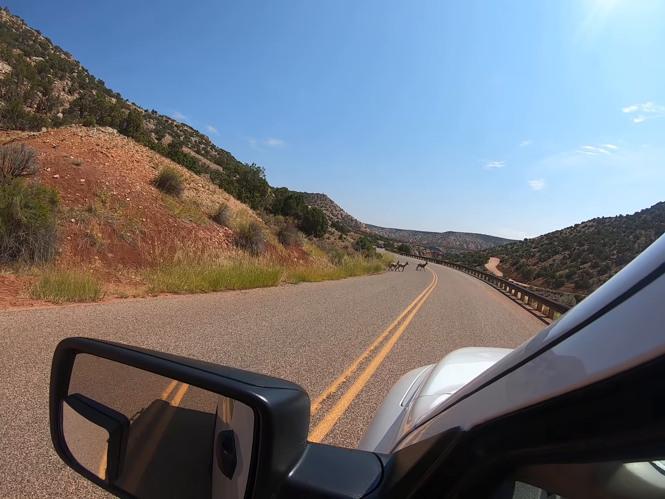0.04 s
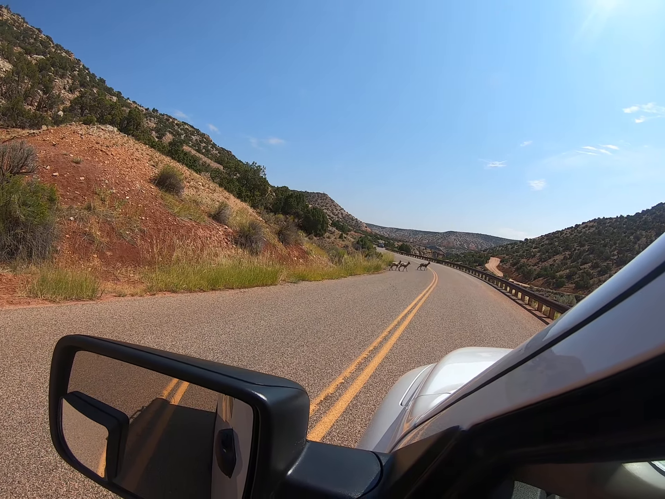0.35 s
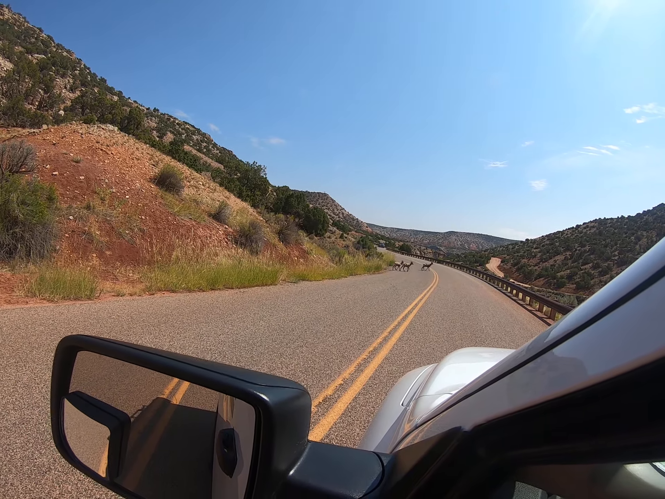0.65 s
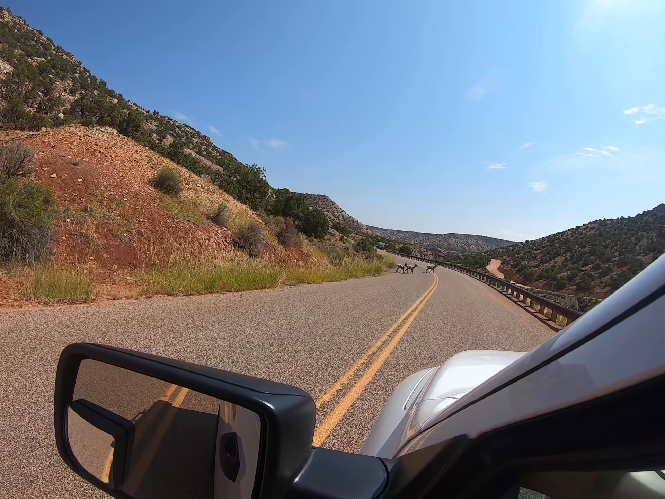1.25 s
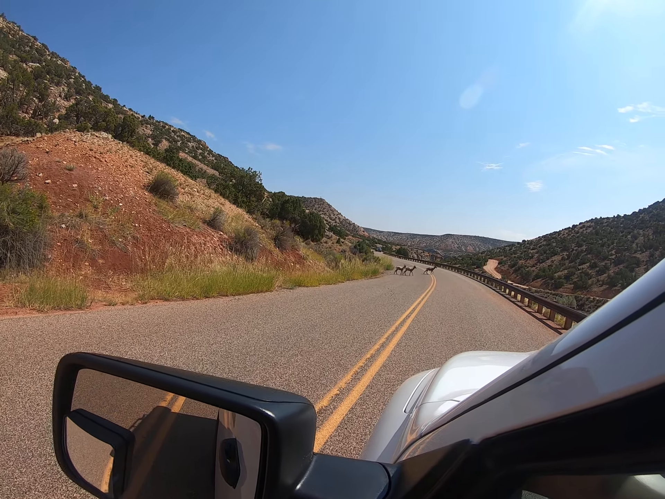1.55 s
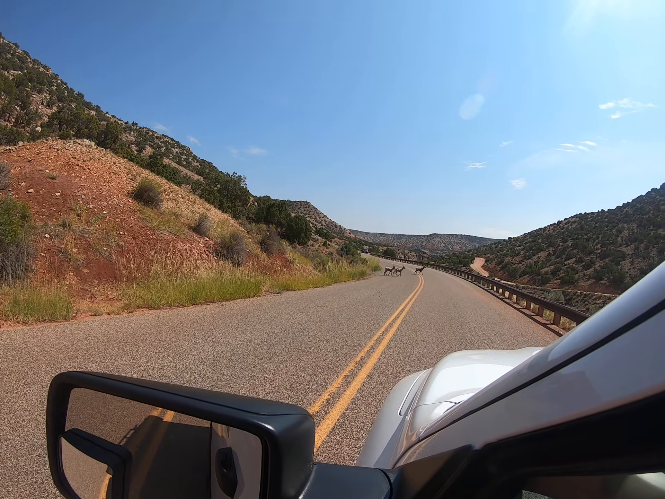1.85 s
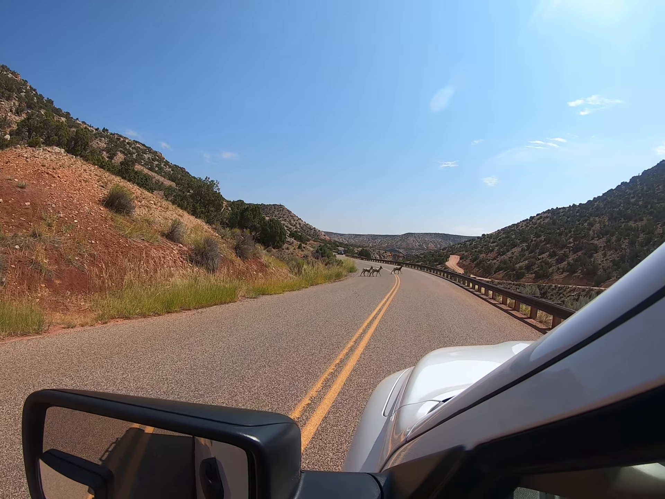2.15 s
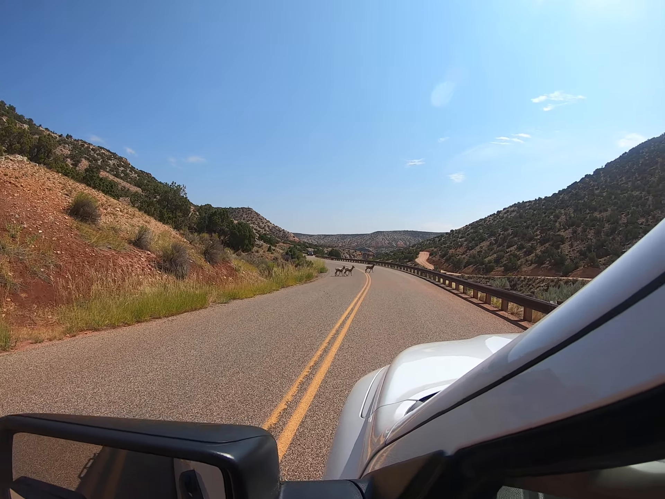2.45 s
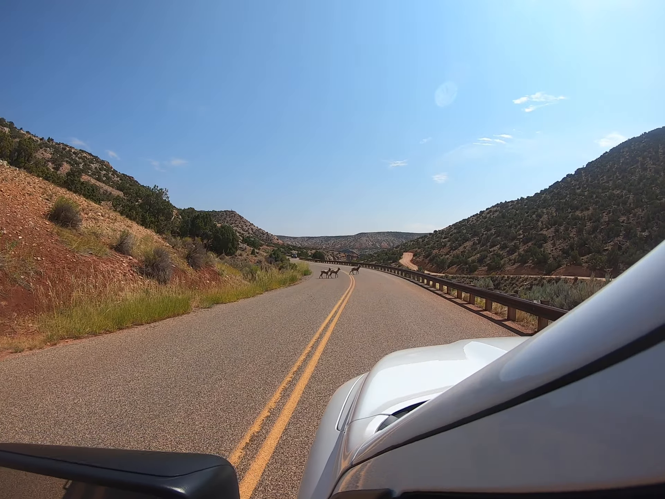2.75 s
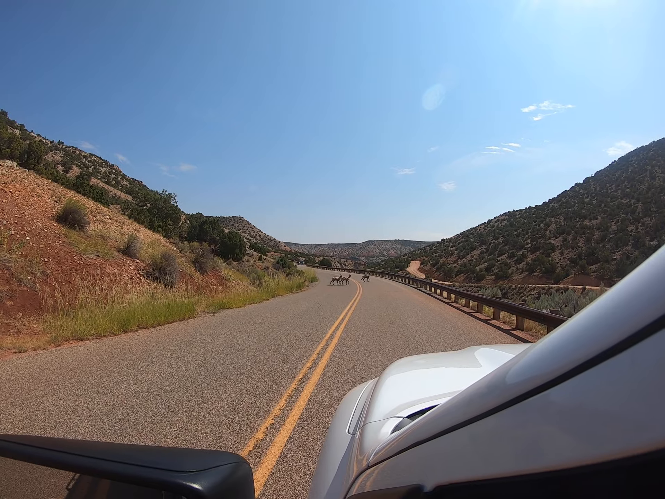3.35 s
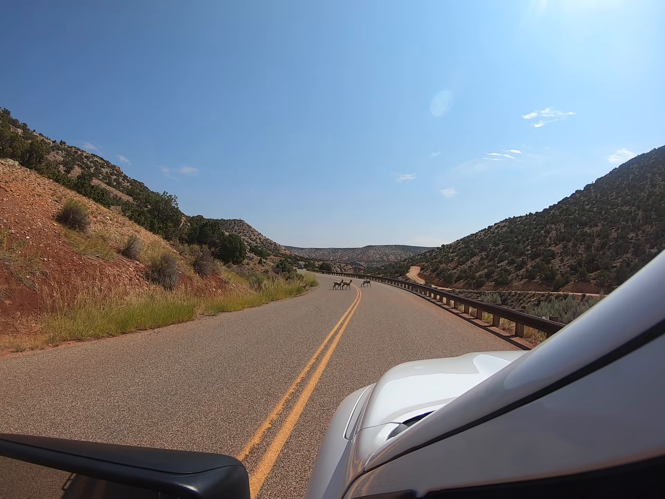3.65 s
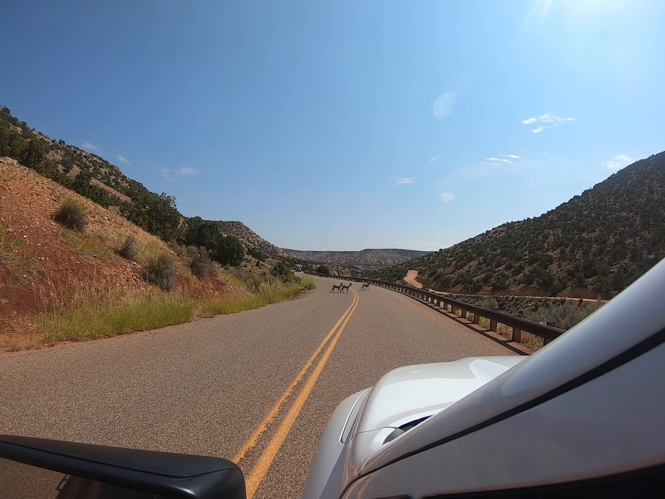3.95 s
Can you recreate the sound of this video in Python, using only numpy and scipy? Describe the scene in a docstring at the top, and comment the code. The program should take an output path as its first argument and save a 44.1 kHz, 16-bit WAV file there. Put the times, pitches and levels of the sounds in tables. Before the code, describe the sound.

Road rumble and gusty wind at a moving truck's open window, with small handling knocks.

```python
"""Tyre and body rumble, slipstream hiss and a steady engine drone: a pickup cruising on a country road,
heard from a camera at its open side window. Eddies buffet the microphone, mostly its right port.
The hand on the camera shifts its grip: brief rustles, three small knocks, a fine crackle.
Near the end a gust swells past and a slipping fingertip squeaks twice."""
import sys
import numpy as np
from scipy import signal
from scipy.fft import rfft, irfft
from scipy.io import wavfile
from scipy.ndimage import uniform_filter1d

SR = 44100
rng = np.random.default_rng(int(sys.argv[2]) if len(sys.argv) > 2 else 0)


def bounce(signal):
    """Save signal as a 16-bit WAV file at the path given by the first command-line argument."""
    frames = np.transpose(np.atleast_2d(signal))
    limited = np.clip(frames, -1, 1)
    pcm = np.round(limited * 32767).astype(np.int16)
    wavfile.write(sys.argv[1], SR, pcm)


N = 176400
T = np.arange(N) / SR


def from_db(db):
    """Decibels to gain."""
    return 10 ** (np.asarray(db) / 20)


def unit_rms(x):
    """Each channel scaled to rms 1."""
    return x / np.sqrt(np.mean(x ** 2, axis=-1, keepdims=True) + 1e-30)


def in_time(rows):
    """Columns of a time table at every sample."""
    times_s, *columns = np.transpose(rows)
    return [np.interp(T, times_s, column) for column in columns]


def at_hz(rows, hz, column=1):
    """One column of a spectrum table, read on a log-frequency axis."""
    rows = np.array(rows)
    return np.interp(np.log(hz), np.log(rows[:, 0]), rows[:, column])


def pan(db):
    """Channel gains for a level difference, left minus right."""
    return from_db(np.array([[.5], [-.5]]) * db)


def drift(rate_hz):
    """Smooth random motion, rms 1."""
    f = np.fft.rfftfreq(N, 1 / SR)
    return unit_rms(irfft(rfft(rng.standard_normal(N)) / (1 + (f / rate_hz) ** 2), N))


def noise(colour, correlation=lambda f: 0, size=N):
    """Stereo noise, rms 1, from spectral shape and left-right correlation by frequency."""
    f = np.fft.rfftfreq(size, 1 / SR) + 1e-6
    mid, side = rfft(rng.standard_normal((2, size)))
    alike = np.clip(correlation(f), -1, 1)
    spectrum = np.sqrt(1 + alike) * mid + np.sqrt(1 - alike) * side * [[1], [-1]]
    return unit_rms(irfft(colour(f) * spectrum, size))


def swell(x, length_s, edge=1):
    """Middle of x as a smooth burst, rms about 1 over its main part; higher edge, softer flanks."""
    t = (np.arange(x.shape[-1]) - x.shape[-1] / 2) / SR
    position = np.clip(t / (length_s * np.sqrt(edge)), -.5, .5)
    burst = x * np.abs(np.cos(np.pi * position)) ** edge
    return burst / np.sqrt(np.sum(burst ** 2, axis=-1, keepdims=True) / (.5 * length_s * SR))


def add(out, x, centre_s):
    """Mix x into out, centred on a time."""
    at = int(centre_s * SR) - x.shape[-1] // 2 + np.arange(x.shape[-1])
    inside = (at >= 0) & (at < N)
    out[:, at[inside]] += x[:, inside]


def resonance(x, hz, width_hz):
    """Two-pole resonance, peak gain 1."""
    r = np.exp(-np.pi * width_hz / SR)
    feedback = [1, -2 * r * np.cos(2 * np.pi * hz / SR), r * r]
    return signal.lfilter(np.array([1, 0, -1]) * (1 - r * r) / 2, feedback, x + 1e-18)


def decay(start_s, t60_s):
    """Envelope: sudden onset, exponential fall."""
    return (T > start_s) * from_db(-60 * np.clip((T - start_s) / t60_s, 0, 10))


def strike(start_s, t60_s, hz, width_hz, colour, correlation=0.27):
    """A brief rough contact rings one resonance; rms about 1 at onset."""
    fade = decay(0, t60_s)[:4096]
    contact = noise(colour, lambda f: correlation, size=4096) * fade
    ring = unit_rms(resonance(contact, hz, width_hz)) * np.sqrt(np.mean(fade ** 2))
    return np.pad(ring, ((0, 0), (int(start_s * SR), N)))[:, :N]


# Rumble spectrum: (frequency [Hz], relative density [dB])
RUMBLE_SPECTRUM = [(20, 7), (45, 1), (70, 6.5), (100, 5.5), (150, -4.5), (245, -7), (310, -15), (400, -20),
                   (480, -30), (700, -55), (3000, -93)]
# Rumble across the ports: (frequency [Hz], correlation [-1..1])
RUMBLE_CORRELATION = [(30, 0.23), (70, 1), (300, 1)]
RUMBLE_DB, RUMBLE_FLUTTER_DB = -32.5, 1


def road_rumble():
    """Tyres shake the body: a low, slightly uneven rumble."""
    rumble = noise(lambda f: from_db(at_hz(RUMBLE_SPECTRUM, f)), lambda f: at_hz(RUMBLE_CORRELATION, f))
    return rumble * from_db(RUMBLE_DB + RUMBLE_FLUTTER_DB * drift(rate_hz=34)) * pan(db=-1)


# Hiss spectrum: (frequency [Hz], relative density [dB])
HISS_SPECTRUM = [(250, 3), (480, 2.5), (640, 0.5), (830, 3.5), (1050, -3), (1400, -6), (1950, -7.5),
                 (2900, -14.5), (3500, -19), (5000, -24), (6500, -28.5), (8000, -33.5), (10500, -38),
                 (12500, -50.5), (15000, -65.5)]
# Hiss across the ports: (frequency [Hz], relative pan [dB], correlation [-1..1])
HISS_PORTS = [(500, 0.5, 0.74), (980, -1.5, 0.37), (2000, 0, 0.71), (4500, 1, 0.68), (10000, 1.5, 0.07)]
# Hiss envelope: (time [s], level before HISS_GAIN_DB [dB], pan [dB])
HISS_ENVELOPE = [(0, -53, -3), (.5, -52.5, -4), (1.3, -53.5, -4.5), (2.2, -53, -3.5), (2.7, -52.5, -3),
                 (3.2, -54, -3.5), (3.6, -53.5, -4), (3.8, -54, -1), (4, -52, -.5)]
HISS_GAIN_DB, HISS_FLUTTER_DB = 6, 0.35


def slipstream():
    """Air and tyres hiss through the open window; the sound shifts as the camera turns."""
    level_db, pan_db = in_time(HISS_ENVELOPE)
    hiss = noise(lambda f: from_db(at_hz(HISS_SPECTRUM, f)) * pan(at_hz(HISS_PORTS, f)),
                 lambda f: at_hz(HISS_PORTS, f, column=2))
    return hiss * from_db(HISS_GAIN_DB + level_db + HISS_FLUTTER_DB * drift(rate_hz=22)) * pan(pan_db)


# Engine partials: (frequency [multiple of DRONE_HZ], level [dB])
ENGINE_PARTIALS = [(.4, -41.5), (1, -49.5), (2, -54.5), (2.84, -67), (3, -63), (4, -59.5), (4.38, -66),
                   (4.7, -68), (5, -60), (6, -67.5), (7, -76), (14, -79), (16, -75.5)]
DRONE_HZ, PITCH_JITTER, PORT_PHASE_RAD = 176.7, .0015, .4
SCATTER_DEPTH, SCATTER_HZ = .48, 8


def engine():
    """Partials locked to the revs; moving air scatters each, so it wavers in strength and phase."""
    pitch_hz = DRONE_HZ * (1 + PITCH_JITTER * drift(rate_hz=7.75))
    drone_rad = 2 * np.pi * np.cumsum(pitch_hz) / SR
    out = 0
    for multiple, db in ENGINE_PARTIALS:
        offset_rad = rng.uniform(0, 2 * np.pi) + rng.normal(0, PORT_PHASE_RAD, (2, 1))
        scatter = 1 + SCATTER_DEPTH * (drift(SCATTER_HZ) + 1j * drift(SCATTER_HZ))
        partial = np.real(scatter * np.exp(1j * (multiple * drone_rad + offset_rad)))
        out = out + from_db(db) * unit_rms(partial)
    return out * pan(db=-6.5)


# Small eddies push one port, pull the other: (frequency [Hz], correlation [-1..1])
EDDY_CORRELATION = [(60, -0.078), (250, -0.92)]


def eddy_pressure(corner_hz, size=N):
    """Turbulent pressure noise: a gentle rise up to a corner frequency, then a steep fall."""
    rise, knee = 0.49, 2.43
    fall = np.array([[3.4], [5.24]])  # exponents: left, right

    def colour(f):
        return (f / corner_hz) ** rise / (1 + (f / corner_hz) ** knee) ** (fall / knee)

    return noise(colour, lambda f: at_hz(EDDY_CORRELATION, f), size)


# Continuous turbulence: (time [s], right level [dB])
TURBULENCE_ENVELOPE = [(0, -36), (.3, -40), (.55, -30.5), (.9, -27.5), (1.15, -28.5), (1.5, -38.5),
                       (1.9, -43.5), (2.4, -28.5), (2.8, -32.5), (3.5, -29.5), (3.65, -40), (3.75, -38.5),
                       (4, -32)]
# Single eddies: (centre [s], length [s], right level [dB], corner [Hz], left re right [dB])
EDDY_HITS = [(0.046, 0.19, -25.5, 124, -8), (0.134, 0.081, -19.5, 69, -4.5), (0.411, 0.037, -19.5, 132, -9),
             (0.567, 0.063, -24, 170, -22), (0.605, 0.015, -17, 140, -10), (0.729, 0.044, -19, 168, -26),
             (.805, 0.12, -17, 133, -7.5), (0.861, 0.074, -23.5, 253, -26), (.926, 0.024, -16.5, 217, -21),
             (.98, 0.028, -29.5, 100, 0), (1.321, 0.0087, -13.5, 170, -14), (1.34, 0.018, -13, 204, -14.5),
             (2.53, 0.047, -25, 164, -15), (2.641, 0.047, -19.5, 252, -22.5),
             (2.74, 0.15, -22.5, 147, -16.5), (2.779, .003, -26, 620, -9), (2.783, .008, -20.5, 240, -15),
             (2.79, 0.035, -12.5, 175, -15), (2.821, 0.026, -12, 188, -17.5), (2.867, 0.052, -18, 218, -23),
             (2.956, 0.16, -22.5, 188, -11), (3.014, 0.0346, -11, 42, -10), (3.088, 0.031, -15, 216, -7),
             (3.145, 0.019, -16, 244, -13), (3.237, 0.031, -20.5, 102, -19),
             (3.276, 0.053, -16.5, 235, -15.5), (3.353, 0.027, -20.5, 201, -10),
             (3.404, 0.026, -18.5, 231, -7.5), (3.485, 0.038, -14, 173, -27), (3.55, 0.047, -15, 245, -19),
             (3.58, 0.029, -17.5, 266, -12.5), (3.707, 0.03, -17, 152, -14), (3.78, 0.033, -20.5, 227, -18),
             (3.895, 0.022, -26.5, 350, -23), (3.932, 0.028, -20, 282, -15.5)]
TURBULENCE_LUMPS_DB, TURBULENCE_LEFT_DB = 4.5, -24.5


def buffeting():
    """Lumpy turbulence and thudding eddies at the ports; the sheltered left port sounds thinner."""
    level_db, = in_time(TURBULENCE_ENVELOPE)
    out = eddy_pressure(corner_hz=141.3) * from_db(level_db + TURBULENCE_LUMPS_DB * drift(rate_hz=27))
    out[0] *= from_db(TURBULENCE_LEFT_DB)
    for centre_s, length_s, db, corner_hz, left_db in EDDY_HITS:
        eddy = swell(eddy_pressure(corner_hz, size=8192), length_s)
        add(out, eddy * from_db([[db + left_db], [db]]), centre_s)
    return out


# Friction spectrum: (frequency [Hz], relative density [dB])
FRICTION_SPECTRUM = [(2000, -9), (3500, 0), (6000, -2.5), (7800, -3), (9800, -1), (12000, -11),
                     (14000, -17), (15500, -21)]


def friction_colour(hz):
    """Bright spectral shape of contact with the housing."""
    return from_db(at_hz(FRICTION_SPECTRUM, hz))


# Hand rubs: (centre [s], length [s], level [dB], pan [dB], ring gain [dB])
HAND_RUBS = [(.33, 0.02, -67, -4, -6), (0.616, 0.082, -63, -8.5, -6), (0.759, 0.11, -71, -6, 3),
             (0.82, 0.091, -67.5, -6, -4), (1.878, 0.024, -58.5, 4, -2), (2.136, 0.038, -62, 5.5, 10),
             (2.18, 0.065, -69, -5, -6), (2.302, .2, -76, -5, 1), (2.441, 0.037, -59.5, 5, 12),
             (2.825, 0.06, -63, 2, 8.5), (2.866, 0.045, -67, 1, -3), (3.079, 0.042, -69.5, 1, 8)]
RUB_GRAIN_DB, LOWER_RING_DB = 1.5, 1.5


def rustles():
    """The hand rubs the housing: fine-grained friction, ringing under harder pressure."""
    out = np.zeros((2, N))
    for centre_s, length_s, db, pan_db, ring_db in HAND_RUBS:
        friction = noise(friction_colour, size=16384)
        grain = unit_rms(uniform_filter1d(rng.standard_normal(friction.shape[-1]), size=60))
        rub = swell(friction * from_db(RUB_GRAIN_DB * grain), length_s, edge=2)
        upper_ring = resonance(rub, hz=4980, width_hz=950)
        lower_ring = from_db(LOWER_RING_DB) * resonance(rub, hz=3550, width_hz=580)
        rustle = rub + from_db(ring_db) * (upper_ring - lower_ring)
        add(out, rustle * from_db(db) * pan(pan_db), centre_s)
    return out


# Knocks: (time [s], click level [dB], click pitch [Hz], click width [Hz], click t60 [s],
# snap level [dB], snap pitch [Hz], crack level [dB], left thump [dB], right thump [dB])
CAMERA_KNOCKS = [(1.8681, -32.5, 750, 320, .013, -56, 6200, -62, -15.5, -25),
                 (2.0005, -35, 560, 700, 0.015, -40.5, 2240, -55, -6.5, -16.5),
                 (3.6395, -34.5, 940, 800, 0.015, -45, 2900, -68, -26, -37)]
# Thump at the left, then right port: (frequency [Hz], rise [s])
PORT_THUMPS = [(73, 0.0044), (34, 0.021)]
CLICK_CORNER_HZ, SNAP_WIDTH_HZ, SNAP_T60_S = 2400, 750, 0.012


def knocks():
    """Knocks on the camera: bright crack, plastic click and higher snap, then a low thump per port."""
    out = np.zeros((2, N))
    for knock in CAMERA_KNOCKS:
        start_s, click_db, click_hz, width_hz, t60_s, snap_db, snap_hz, crack_db, *thump_db = knock
        click = strike(start_s, t60_s, click_hz, width_hz, lambda f: 1 / (1 + (f / CLICK_CORNER_HZ) ** 2))
        snap = strike(start_s, SNAP_T60_S, snap_hz, SNAP_WIDTH_HZ, lambda f: 1 / (1 + (f / snap_hz) ** 2))
        crack = noise(friction_colour) * decay(start_s, t60_s=.01)
        out += (from_db(click_db) * click + from_db(snap_db) * snap) * pan(db=1.5)
        out += from_db(crack_db) * crack * pan(db=14)
        age_s = np.maximum(T - start_s, 0)
        for port, (hz, rise_s) in enumerate(PORT_THUMPS):
            envelope = age_s / rise_s * np.exp(1 - age_s / rise_s)
            out[port] -= from_db(thump_db[port]) * envelope * np.sin(2 * np.pi * hz * age_s)
    return out


# Grip crackle: (time [s], level [dB])
CRACKLE_ENVELOPE = [(2.1, -100), (2.17, -78), (2.33, -84), (2.42, -82), (2.66, -87), (2.8, -100)]
# Grip ticks: (time [s], level [dB], ring [Hz], width [Hz])
GRIP_TICKS = [(2.179, -66, 11200, 2000), (2.189, -62, 10800, 2200), (2.2545, -61, 10600, 1000),
              (2.2995, -62, 7900, 1400), (2.314, -67, 10600, 600), (2.34, -71, 10600, 600),
              (2.627, -54, 4400, 1700), (2.929, -63, 10600, 4000)]
SLIPS_PER_S, SLIP_SPREAD_DB = 900, 2
CRACKLE_HZ, CRACKLE_WIDTH_HZ, TICK_T60_S = 10900, 1900, .011


def crackle():
    """The tightened grip creeps in tiny slips: fine high crackle, a few distinct ticks."""
    level_db, = in_time(CRACKLE_ENVELOPE)
    slips = (rng.random(N) < SLIPS_PER_S / SR) * rng.choice([-1, 1], (2, N))
    fine = slips * from_db(SLIP_SPREAD_DB * rng.standard_normal(N))
    for _ in range(2):
        fine = resonance(fine, CRACKLE_HZ, CRACKLE_WIDTH_HZ)
    ticks = sum(from_db(db) * strike(start_s, TICK_T60_S, hz, width_hz, friction_colour)
                for start_s, db, hz, width_hz in GRIP_TICKS)
    return unit_rms(fine) * from_db(level_db) * pan(db=-3.5) + ticks * pan(db=-1)


# Gust envelope: (time [s], level [dB])
GUST_ENVELOPE = [(3.6, -71), (3.76, -58.5), (3.9, -52), (4, -52.5)]
# Gust spectrum: (frequency [Hz], relative density [dB])
GUST_SPECTRUM = [(150, -7), (330, 9.5), (600, 8), (1100, -8.5), (2000, -7), (3000, -5.5), (3800, -11),
                 (5500, -32), (9000, -52.5)]


def gust():
    """A swell of air rushes past the window edge."""
    level_db, = in_time(GUST_ENVELOPE)
    air = noise(lambda f: from_db(at_hz(GUST_SPECTRUM, f)), correlation=lambda f: 1)
    return air * from_db(level_db) * pan(db=-1)


# Fingertip slips: (centre [s], length [s], level [dB], centre pitch [Hz])
FINGER_SLIPS = [(3.644, 0.0072, -40, 1165), (3.661, 0.012, -51, 1290)]
SQUEAK_RISE_HZ_PER_S, SQUEAK_ROUGHNESS = 65000, .3


def squeaks():
    """A fingertip slips on the housing: very short, rough upward chirps."""
    out = np.zeros((2, N))
    t = (np.arange(4096) - 2048) / SR
    for centre_s, length_s, db, hz in FINGER_SLIPS:
        grain = unit_rms(uniform_filter1d(rng.standard_normal((2, len(t))), size=40))
        chirp = np.sin(2 * np.pi * (hz * t + SQUEAK_RISE_HZ_PER_S * t * t / 2))
        squeak = swell(chirp * (1 + SQUEAK_ROUGHNESS * grain), length_s)
        add(out, squeak * from_db(db) * pan(db=1.5), centre_s)
    return out


def scene():
    """Moving vehicle, wind on the microphone, hand on the camera."""
    vehicle = road_rumble() + slipstream() + gust() + engine()
    return vehicle + buffeting() + rustles() + crackle() + knocks() + squeaks()


FADE_IN_S, CUTOFF_HZ = .004, 15600


def record(dry):
    """Very short fade-in, steep low-pass."""
    lowpass = signal.ellip(10, .1, 80, CUTOFF_HZ, fs=SR, output="sos")
    return signal.sosfilt(lowpass, dry * np.minimum(T / FADE_IN_S, 1))


dry = scene()
out = record(dry)
bounce(out)
```